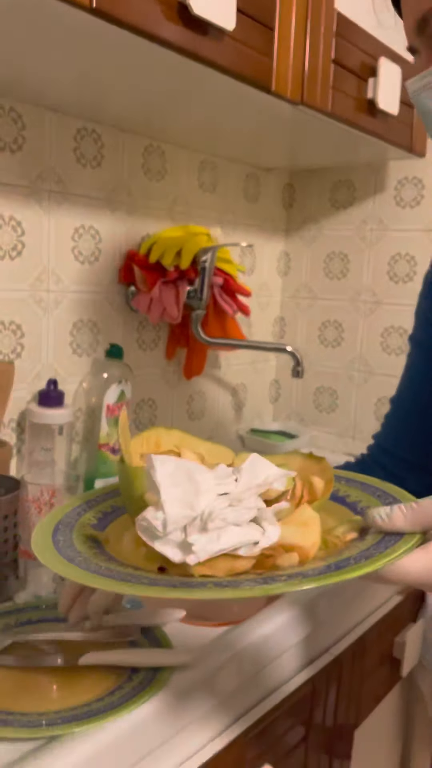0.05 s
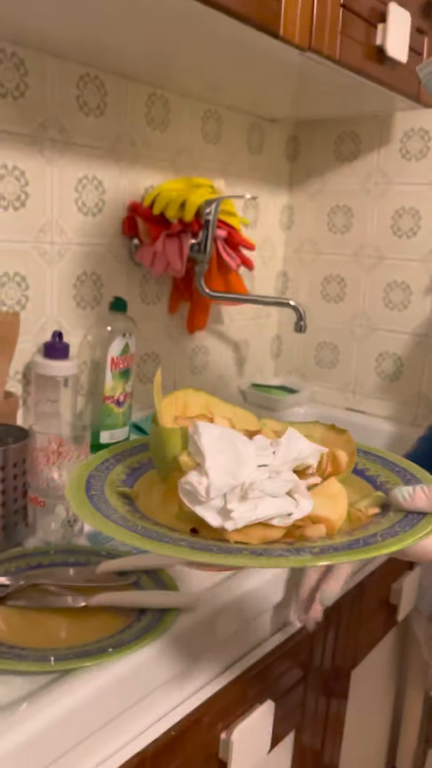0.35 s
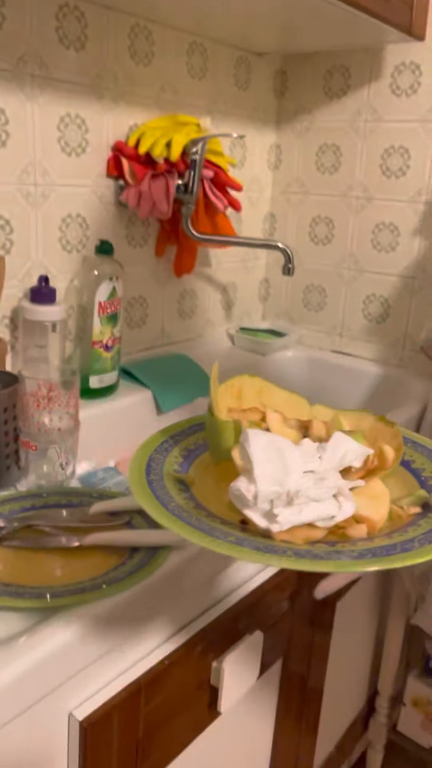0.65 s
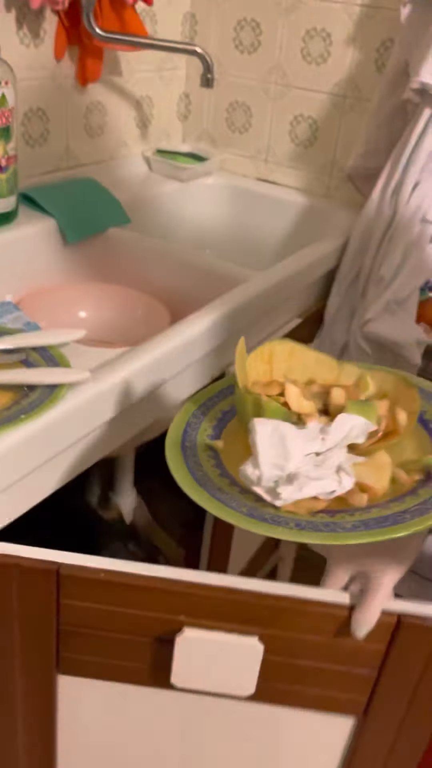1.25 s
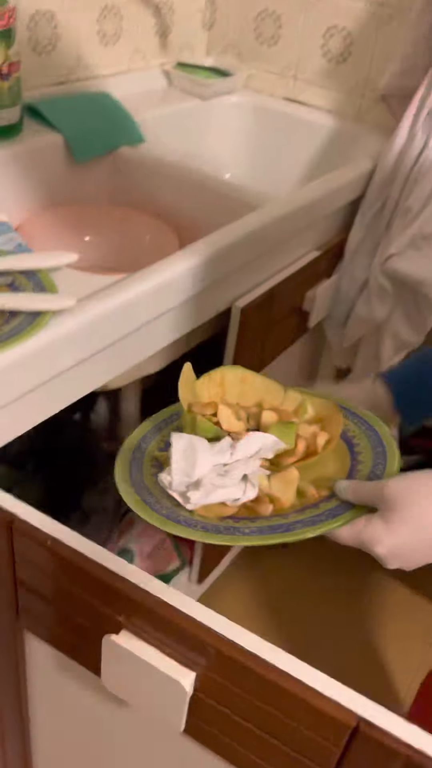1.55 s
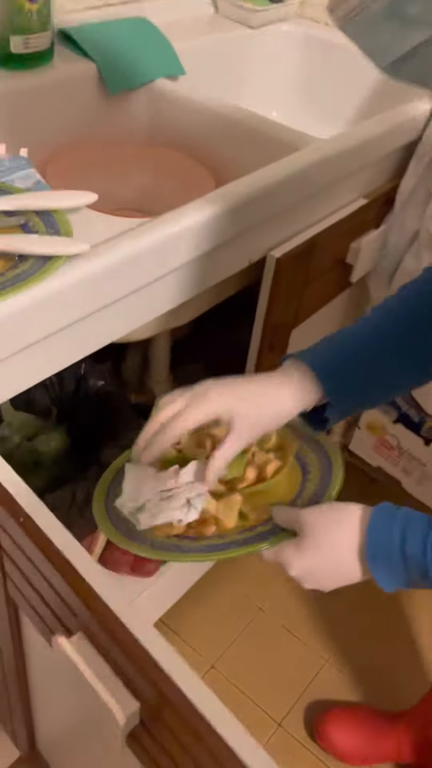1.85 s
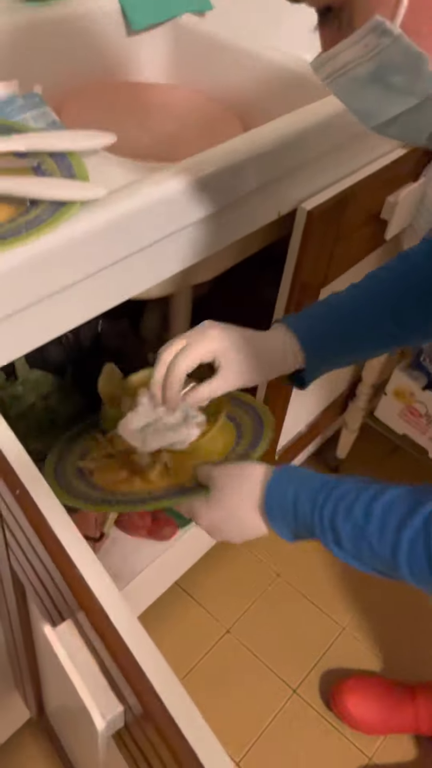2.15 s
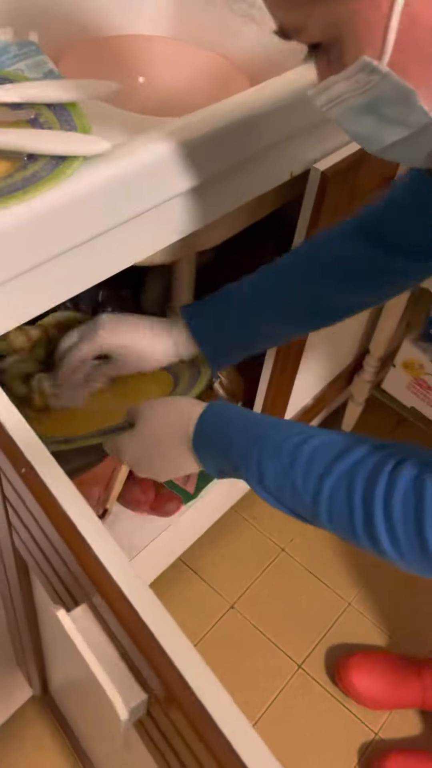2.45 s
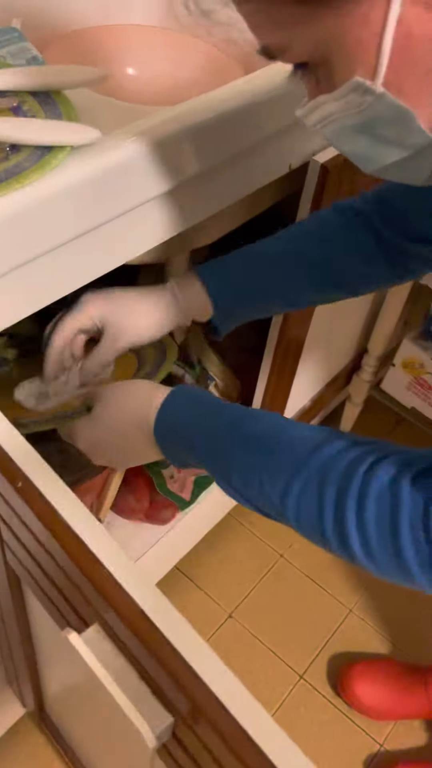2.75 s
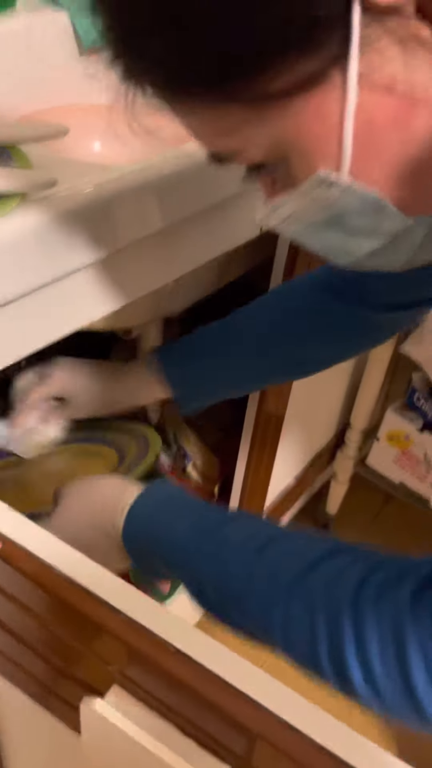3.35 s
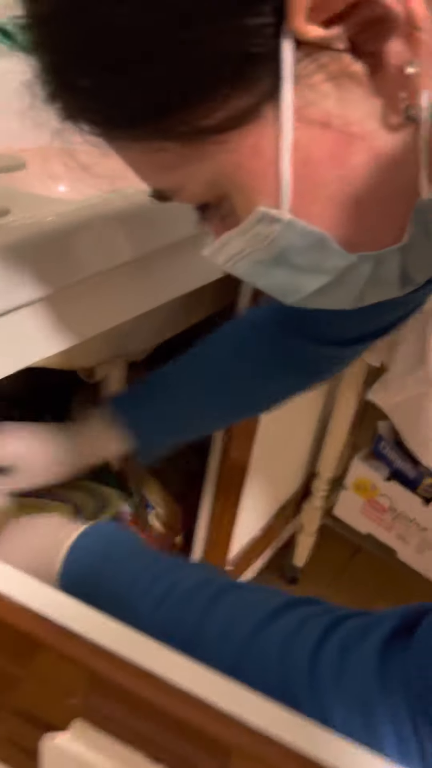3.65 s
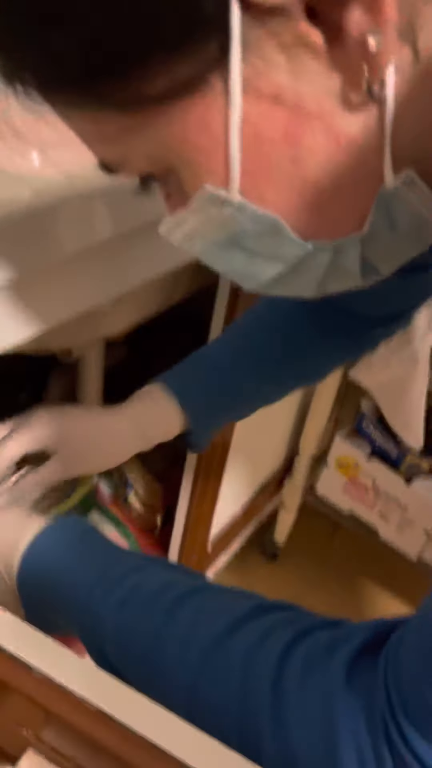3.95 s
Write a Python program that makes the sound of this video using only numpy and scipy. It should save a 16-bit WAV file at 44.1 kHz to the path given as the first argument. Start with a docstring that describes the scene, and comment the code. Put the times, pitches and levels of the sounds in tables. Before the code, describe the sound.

Cutlery clatters sharply onto stacked plates in a small tiled kitchen. A cupboard thuds open with brief hinge squeaks, then a paper napkin softly wipes scraps off a plate and lumps drop into a rustling bin bag.

```python
"""A small tiled kitchen. Cutlery clatters onto a stack of plates, each impact exciting their damped modes.
The cupboard under the sink thuds open, its hinges squeaking by stick-slip friction. A paper napkin
wipes scraps off a plate and squeaks on the glaze; lumps drop into a bin bag whose creases crackle.
A fridge hums behind it all, and the tiles add reverberation to the action."""
import sys
import numpy as np
from scipy import signal
from scipy.fft import rfft, irfft, next_fast_len
from scipy.io import wavfile
from scipy.ndimage import uniform_filter1d, map_coordinates

SR = 44100
rng = np.random.default_rng(int(sys.argv[2]) if len(sys.argv) > 2 else 0)


def persist_wave(psi):
    """Save psi, clipped to +-1, as 16-bit WAV."""
    counts = np.round(np.clip(psi, -1, 1) * 32767).astype(np.int16)
    wavfile.write(sys.argv[1], SR, np.atleast_2d(counts).T)


N = 176400


def amp(db):
    """Amplitude ratio of a level in decibels."""
    return 10 ** (np.asarray(db) / 20)

def unit(x):
    """Normalisation to rms 1."""
    return x / np.sqrt(np.mean(x ** 2) + 1e-20)

def along(points, hz):
    """Interpolation of (f/Hz, value) points on a logarithmic frequency axis."""
    f, v = np.transpose(points)
    return np.interp(np.log(hz + 1), np.log(f + 1), v)

def curves(rows):
    """Linear interpolation in time: one curve for each column after t/s."""
    s, *cols = np.transpose(rows)
    return [np.interp(np.arange(N) / SR, s, c) for c in cols]

def wobble(rate, size=N):
    """Smooth random modulation: a spline through `rate` knots a second."""
    knots = rng.standard_normal(size // 8)
    return map_coordinates(knots, [np.arange(size) * rate / SR], mode="mirror")

def colour(x, points, tilt_db=0):
    """Spectral shaping by (f/Hz, gain/dB) points, with a tilt per octave above 500 Hz."""
    m = next_fast_len(len(x) + 4096)
    hz = np.fft.rfftfreq(m, 1 / SR)
    gain_db = along(points, hz) + tilt_db * np.log2(np.maximum(hz, 500) / 4000)
    return irfft(rfft(x, m) * amp(gain_db), m)[:len(x)]

def noise(points, size=N, tilt_db=0):
    """Filtered Gaussian noise of rms 1."""
    return unit(colour(rng.standard_normal(size), points, tilt_db))

def fade(t, t60):
    """Exponential decay, by 60 dB in t60 seconds."""
    return np.exp(-np.log(1000) * t / t60)

def arch(t, length):
    """Rounded envelope: the square root of a half sine."""
    return np.sqrt(np.abs(np.sin(np.pi * np.clip(t / length, 0, 1))))

def ring(modes, t, line_width_hz=13):
    """Damped modes (f/Hz, level/dB, T60/s); loose contact broadens each line by phase diffusion."""
    hz, db, t60 = np.transpose(modes)[:, :, None]
    walk = np.cumsum(rng.standard_normal((len(hz), len(t))), axis=1)
    drift = walk * np.sqrt(2 * np.pi * line_width_hz / SR)
    phase = 2 * np.pi * (hz * t + rng.random(hz.shape)) + drift
    return (amp(db) * fade(t, t60) * np.sin(phase)).sum(0)

def add(track, s, x):
    """Superposition of x on the track, starting at s seconds."""
    i = round(s * SR)
    x = x[max(-i, 0):N - i]
    track[max(i, 0):][:len(x)] += x


# partials of the fridge: f/Hz, level/dB
FRIDGE_PARTIALS = [(96.9, -70), (145.5, -60.5), (214, -68), (457.6, -69.5), (490, -72), (539, -66.5)]

def fridge_and_air():
    """Tones over a noise floor: a hum with slight phase modulation, in still room air."""
    t = np.arange(N) / SR
    hum = sum(amp(db) * np.sqrt(2) * np.sin(2 * np.pi * hz * t + .5 * wobble(1.9))
              for hz, db in FRIDGE_PARTIALS)
    air = noise([(20, -29.5), (50, -5), (330, -8.5), (400, -6), (600, -13), (2000, -34.5), (14000, -55)])
    return hum + amp(-62.5) * air


# envelope of the rumble: t/s, level/dB
RUMBLE_ENVELOPE = [(0, -62.5), (.08, -50.5), (.27, -56), (.5, -48.5), (.64, -41), (.8, -54), (.92, -57),
                   (1.06, -47.5), (1.14, -40), (1.3, -48), (1.45, -50.5), (1.6, -74), (2.3, -59),
                   (2.42, -49), (2.55, -60.5), (2.9, -66)]
# its spectrum: f/Hz, level/dB
RUMBLE_SPECTRUM = [(20, -28), (45, -5.5), (88, 6.5), (130, -6), (220, -13), (300, -12.5), (420, -24),
                   (900, -51)]

def rumble():
    """Amplitude-modulated low noise from steps and the swinging door."""
    return amp(curves(RUMBLE_ENVELOPE)[0]) * noise(RUMBLE_SPECTRUM)


# ticks of the catch and snaps of the bag: t/s, level/dB, tilt/(dB per octave)
TICK_EVENTS = [(.5536, -47.5, -1), (0.6648, -53.5, -3.5), (.9108, -53.5, -1), (1.063, -47, -9),
               (1.1597, -46.5, -4), (1.3636, -41, 8), (1.3835, -34.5, 6.5), (2.2837, -43, -6.5),
               (2.5521, -44.5, -5), (2.6988, -48, -5.5), (3.1921, -49.5, -7.5), (3.7138, -40, -5)]
# their spectrum: f/Hz, level/dB
TICK_SPECTRUM = [(200, -29), (1200, -7), (4000, 0), (7000, 0.5), (12000, 10.5), (16000, -6)]

def ticks():
    """Impulsive transients: a sharp spike of noise with a short decay."""
    out, t = np.zeros(N), np.arange(SR // 10) / SR
    envelope = fade(t, t60=0.048) + fade(t, t60=0.00075)
    for s, db, tilt in TICK_EVENTS:
        add(out, s, amp(db) * noise(TICK_SPECTRUM, len(t), tilt) * envelope)
    return out


def shifting_folds(x, depth_db=3):
    """Time-varying filtering: the spectrum shifts at random as folds open and close."""
    z = signal.stft(x, nperseg=512)[2]
    field = uniform_filter1d(rng.standard_normal(z.shape), size=7, axis=0)
    field = uniform_filter1d(field, size=6, axis=1)
    return unit(signal.istft(z * amp(depth_db * unit(field)), nperseg=512)[1][:N])

# bag, napkin and sleeves while reaching, then scraping: t/s, treble level/dB, midrange level/dB
REACH_ENVELOPE = [(.48, -81, -60.5), (.57, -68.5, -61), (.69, -70, -61.5), (.745, -66, -52),
                  (.83, -63, -55), (.92, -74.5, -63.5), (.97, -68, -63), (1.04, -81.5, -61),
                  (1.18, -62, -60), (1.34, -70.5, -62), (1.395, -51, -51.5), (1.47, -71, -61),
                  (1.62, -82, -70)]
SCRAPE_ENVELOPE = [(1.86, -78, -68.5), (1.971, -57, -60), (2.08, -57.5, -55.5), (2.2, -47.5, -47.5),
                   (2.32, -54, -55.5), (2.52, -58.5, -60.5), (2.59, -49.5, -50), (2.66, -62, -60),
                   (2.71, -55, -52.5), (2.8, -65, -63), (2.85, -59.5, -58), (2.96, -75.5, -68),
                   (3.061, -56.5, -67), (3.149, -85.5, -73), (3.27, -51.5, -48.5), (3.36, -64.5, -64),
                   (3.4, -52, -59.5), (3.56, -56, -55.5), (3.76, -63, -62), (3.87, -77, -69.5),
                   (3.978, -65, -62)]
# spectra of the treble crinkle and the midrange swish: f/Hz, level/dB
CRINKLE_SPECTRUM = [(2500, -15.5), (4500, -5.5), (6500, -1), (8000, -4.5), (10200, -1.5), (11800, 6.5),
                    (13000, -17), (15000, -20)]
SWISH_SPECTRUM = [(200, -3), (600, 0), (2500, 0), (4000, -6.5), (6000, -16.5), (10000, -38.5)]

def rustle(creases_per_s=2500, crease_share=0.45):
    """Shot noise: tiny creases of plastic and paper crackle over a soft swish."""
    treble_db, middle_db = curves(list(REACH_ENVELOPE) + list(SCRAPE_ENVELOPE))
    impulses = (rng.random(N) < creases_per_s / SR) * rng.standard_normal(N)
    creases = unit(impulses * amp(-np.minimum(rng.exponential(size=N), 3)))
    out = np.zeros(N)
    for db, spectrum in (treble_db + 0.5, CRINKLE_SPECTRUM), (middle_db - 1, SWISH_SPECTRUM):
        source = np.sqrt(crease_share) * creases + np.sqrt(1 - crease_share) * rng.standard_normal(N)
        out += amp(db) * shifting_folds(colour(source, spectrum))
    return out


# hiss of the wipe, coloured by the plate: f/Hz, level/dB
WIPE_SPECTRUM = [(200, -7), (380, 1), (1400, -2), (2600, -7), (3300, -0.5), (3900, -5.5), (4600, 2),
                 (5500, -8.5), (7500, -2.5), (10000, -26)]

def wipe(start_s=3.221, length_s=0.095, from_hz=1750, to_hz=684, width_hz=520):
    """Friction noise: one quick wipe gives a falling resonance and a broad hiss."""
    out, t = np.zeros(N), np.arange(SR // 4) / SR
    hz = to_hz + (from_hz - to_hz) * np.clip(1 - t / length_s, 0, 1) ** 1.5
    phase = 2 * np.pi * np.cumsum(hz) / SR
    band = unit(wobble(width_hz, len(t)) * np.sin(phase) + wobble(width_hz, len(t)) * np.cos(phase))
    hiss = noise(WIPE_SPECTRUM, len(t))
    add(out, start_s, arch(t, length_s) ** 2 * (amp(-45.5) * band + amp(-44) * hiss))
    return out


def stick_slip(rows, jitter, flutter_hz, roughness):
    """Stick-slip oscillation: short glides of three harmonics, unsteady in pitch and amplitude."""
    out, t = np.zeros(N), np.arange(SR // 8) / SR
    for s, length, from_hz, to_hz, db, slope_db in rows:
        hz = np.interp(t, [0, length], [from_hz, to_hz]) * (1 + jitter * wobble(flutter_hz, len(t)))
        phase = 2 * np.pi * np.cumsum(hz) / SR
        grip = unit(1 + roughness * wobble(flutter_hz, len(t)))
        tone = sum(amp(slope_db * k - 7.9 * k * (k - 0.5)) * np.sin((k + 1) * phase) for k in range(3))
        add(out, s, amp(db) * arch(t, length) * grip * tone)
    return out

# napkin squeaks: t/s, duration/s, start f/Hz, end f/Hz, level/dB, overtone boost/(dB per harmonic)
NAPKIN_SQUEAKS = [(3.381, 0.105, 1650, 1576, -43, -4.5), (3.475, 0.084, 1650, 1605, -54, -6)]

def napkin():
    """Stick-slip friction of paper on glaze: rough, nearly level squeaks."""
    return stick_slip(NAPKIN_SQUEAKS, jitter=0.029, flutter_hz=892, roughness=0.46)

# hinge squeaks: t/s, duration/s, start f/Hz, end f/Hz, level/dB, overtone boost/(dB per harmonic)
HINGE_SQUEAKS = [(1.286, 0.029, 1012, 1052, -43.5, -1.5), (1.323, 0.011, 1370, 1410, -40.5, 0.5),
                 (1.332, 0.019, 1485, 1505, -45, -11), (1.39, 0.0304, 904, 938, -48, -5),
                 (1.482, 0.0263, 1010, 935, -47, -13), (1.502, 0.049, 860, 650, -49, -5),
                 (1.502, 0.0095, 1370, 1270, -58.5, 8), (1.545, 0.0256, 1442, 1083, -55, -0.5)]

def hinges():
    """Stick-slip friction in the hinges: brief chirps, first rising, then falling."""
    return stick_slip(HINGE_SQUEAKS, jitter=0.04, flutter_hz=380, roughness=0.12)


# the door pulled free, then lumps landing in the bin:
# t/s, level/dB, final f/Hz, swell/s, T60/s, treble gain/dB
THUD_EVENTS = [(1.061, -22, 79.9, .06, 0.22, -12), (2.183, -34, 110, 0.016, 0.154, 2),
               (2.3208, -22, 109.7, 0.017, 0.12, -2), (2.378, -30.5, 102, 0.023, 0.15, -25)]
# modes of the cupboard: f/Hz, level/dB, T60/s
KNOCK_MODES = [(156.2, -10.5, .2), (308.2, -14.5, 0.11), (693, -5, 0.058), (846, -16, 0.099),
               (1367, -7.5, 0.036)]
# boom of its cavity: f/Hz, level/dB
BOOM_SPECTRUM = [(20, -26), (80, -4), (450, -12.5), (1400, -21), (8000, -46)]

def thuds(sweep_hz=1506, sweep_s=.0054, rise_s=0.005):
    """Impact excitation: the treble arrives first and falls to a low note as the cupboard resonates."""
    out, t = np.zeros(N), np.arange(SR // 2) / SR
    for s, db, low_hz, swell, t60, treble_db in THUD_EVENTS:
        hz = low_hz + sweep_hz * np.exp(-t / sweep_s)
        envelope = np.minimum(t / swell, 1) ** 2.25 * fade(np.maximum(t - swell, 0), t60)
        note = envelope * np.sin(2 * np.pi * np.cumsum(hz) / SR)
        knock = ring(KNOCK_MODES, t)
        boom = amp(-13) * noise(BOOM_SPECTRUM, len(t)) * fade(t, t60=0.24)
        cupboard = (knock + boom) * np.minimum(t / rise_s, 1)
        add(out, s, amp(db) * colour(note + cupboard, [(330, 0), (600, treble_db)]))
    return out


# cutlery striking the plates: t/s, level/dB, tilt/(dB per octave)
CUTLERY_STRIKES = [(-.035, -16.5, -2.5), (.001, -26, -2.5), (0.046, -28.5, -2.5), (0.0649, -1, 1),
                   (0.0723, -5.5, 0.5), (.084, -11, 0), (0.0934, -6.5, -1), (.099, -12.5, -2),
                   (.119, -17.5, 2), (.176, -34, -5), (0.194, -23.5, -3), (.2359, -25.5, -3)]
# main modes of plates and cutlery: f/Hz, level/dB, T60/s
MAIN_MODES = [(602.5, -17.5, 0.38), (1340, -17, 0.44), (1400, -6.5, 0.16), (1983, -8, 0.22),
              (2520, -11.5, .22), (3503, -7, 0.14), (3911, -2.5, 0.14), (5280, -5, 0.13), (5735, -11, 0.42),
              (5835, -7, 0.26), (7015, -6.5, 0.25), (10275, -3.5, .19), (11960, -3.5, 0.2),
              (12130, -0.5, 0.19)]
# spectrum of their dense ringing: f/Hz, level/dB
CLASH_SPECTRUM = [(200, -14.5), (420, -29), (620, -9), (1200, -3), (4000, -2), (4800, -5.5), (5800, -2),
                  (8500, -7), (12100, -4.5), (14800, -11.5)]

def clatter(fine_t60=0.17, rattle_gap_s=0.014, rise_s=.0012):
    """Free vibration after impact: each contact cracks, then rings the main modes and many finer ones."""
    out, t = np.zeros(N), np.arange(SR // 2) / SR
    fine_hz = np.geomspace(560, 14500, 260) * np.exp(.012 * rng.standard_normal(260))
    fine = ring([(hz, along(CLASH_SPECTRUM, hz) + 10 * np.log10(hz), fine_t60) for hz in fine_hz], t)
    fine /= fine[:SR // 100].std()
    # light strikes as the cutlery settles
    rattles = [(s + rng.random() * rattle_gap_s, -37 + 2 * rng.standard_normal(), -5.5)
               for s in np.arange(.245, .36, rattle_gap_s)]
    clash, crack = amp(-13.5) * fade(t, t60=0.066), amp(-14) * fade(t, t60=0.0083)
    attack = 1 - np.exp(-t / rise_s)
    for s, db, tilt in CUTLERY_STRIKES + rattles:
        force = rng.standard_normal(SR // 100) * fade(t[:SR // 100], t60=0.0027)
        shimmer = signal.fftconvolve(fine, force / np.linalg.norm(force))[:len(t)]
        ringing = amp(-19.5) * ring(MAIN_MODES, t) + amp(-20.5) * shimmer
        burst = noise(CLASH_SPECTRUM, len(t)) * (clash + crack)
        add(out, s, amp(db) * colour(ringing + burst, [(60, -15), (350, 2)], tilt) * attack)
    return out


# reverberation time of the tiled room: f/Hz, T60/s
REVERB_TIMES = [(100, 0.63), (700, 0.77), (4000, 0.6), (8000, .49), (13000, 0.36)]

def kitchen(x, wet_db):
    """Reverberation: direct sound plus its convolution with an exponentially decaying noise tail."""
    hz, t, z = signal.stft(rng.standard_normal(SR), SR, nperseg=256)
    tail = signal.istft(z * fade(t, along(REVERB_TIMES, hz)[:, None]), SR, nperseg=256)[1]
    tail[:SR // 250] = 0  # the first reflection takes 4 ms
    return x + amp(wet_db) * signal.fftconvolve(x, tail / np.linalg.norm(tail))[:N]


# stereo width: f/Hz, side level over mid/dB
SIDE_GAIN = [(100, -35), (370, -9.5), (680, -2), (1400, -15), (2800, -6), (6000, -4.5), (8000, 6.5),
             (11000, 3), (12200, -14)]

def widen(mid, across):
    """Mid-side stereo: sound crossing the microphones leads on the left, its phase varying with pitch."""
    m = next_fast_len(N + SR // 4)
    z = rfft(across, m)
    lead = np.pi / 2 + .5 * wobble(200, len(z))
    side = colour(irfft(z * np.exp(1j * lead), m)[:N], SIDE_GAIN)
    return np.array([mid + side, mid - side])


def scene():
    """Superposition of all sources in one room, whose reflections differ with direction."""
    near = thuds() + rumble() + hinges() + napkin() + ticks() + rustle() + wipe()
    dishes, background = clatter(), fridge_and_air()
    mid, across = [kitchen(dishes, wet_db=-12.5) + kitchen(near, wet_db=-10.5) + background
                   for _ in range(2)]
    return widen(mid, across)


# response of the microphone: f/Hz, gain/dB
MIC_RESPONSE = [(4400, 0.5), (4850, -8.5), (5250, 1.5), (8100, -0.5), (8700, -17), (9300, -32.5),
                (9900, -4), (12800, 2.5), (13500, -8.5), (14500, -11)]
BAND_LIMIT_HZ = 14955

def record(dry):
    """Frequency response: the microphone has two narrow dips and passes nothing above its band limit."""
    m = next_fast_len(N + SR // 4)
    hz = np.fft.rfftfreq(m, 1 / SR)
    return irfft(rfft(dry, m) * amp(along(MIC_RESPONSE, hz)) * (hz < BAND_LIMIT_HZ), m)[:, :N]


dry = scene()
out = record(dry)
persist_wave(out)
```